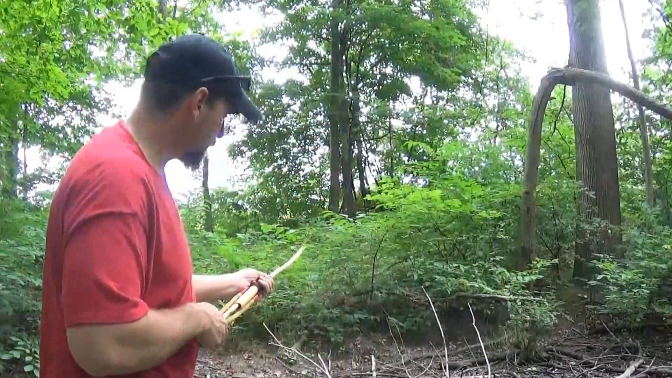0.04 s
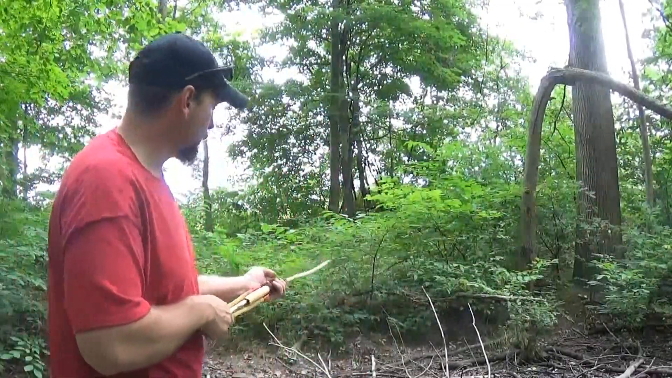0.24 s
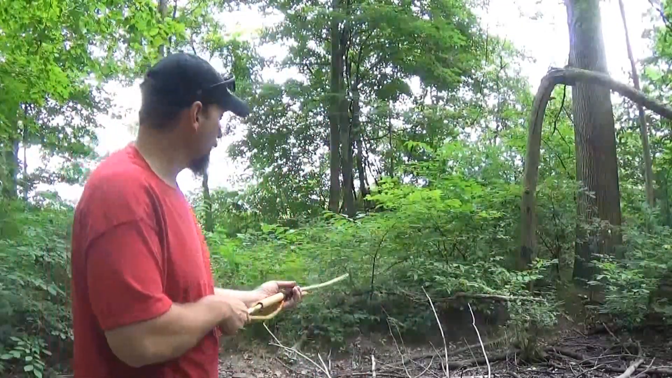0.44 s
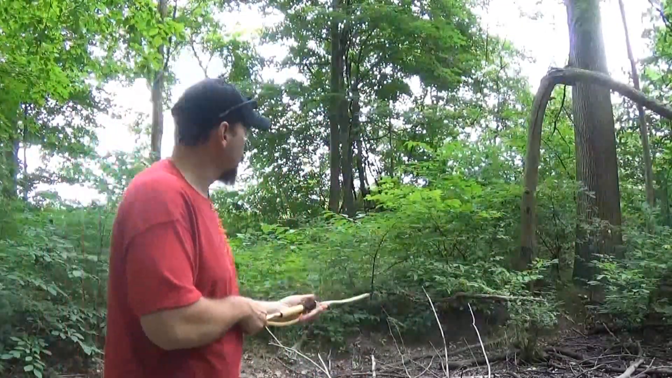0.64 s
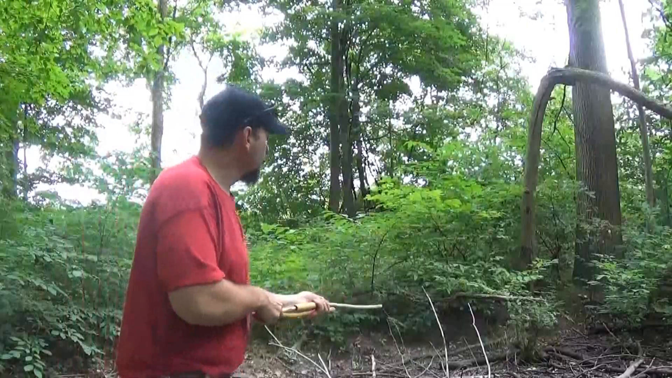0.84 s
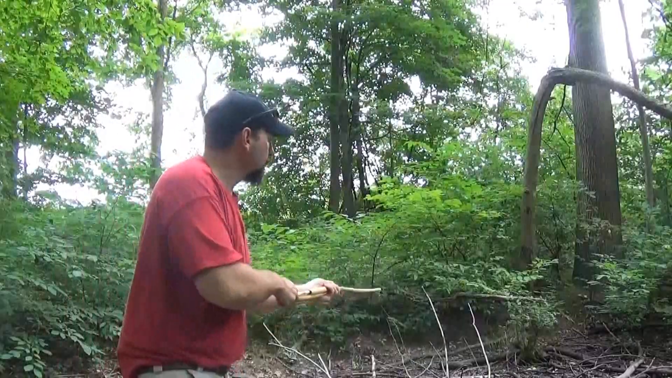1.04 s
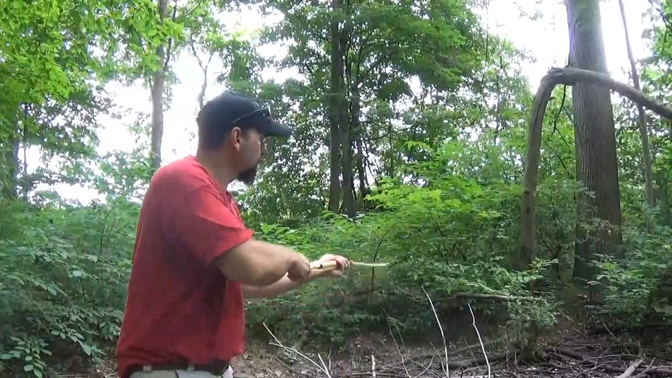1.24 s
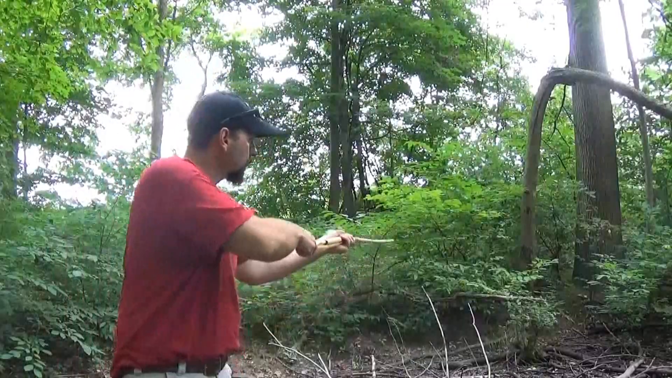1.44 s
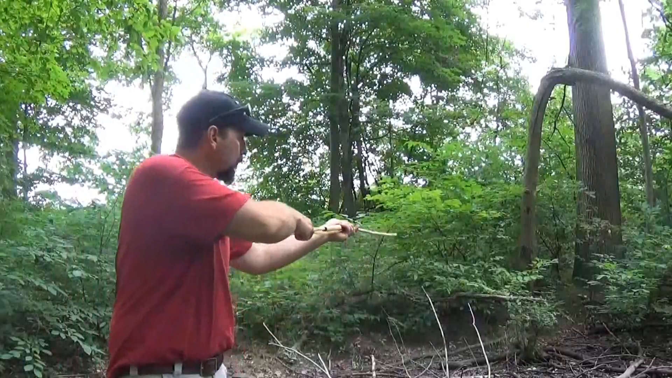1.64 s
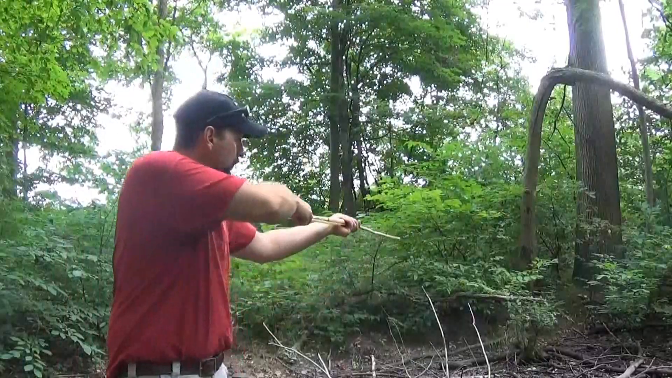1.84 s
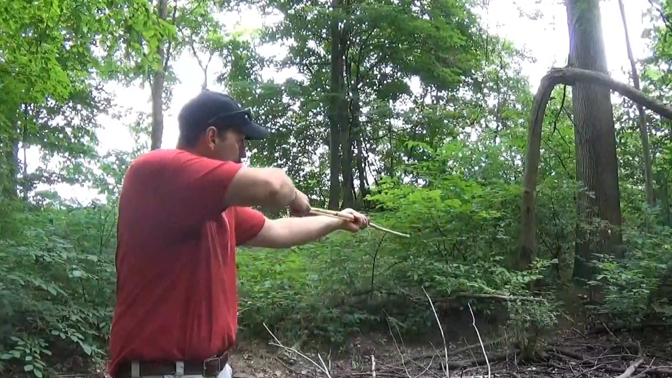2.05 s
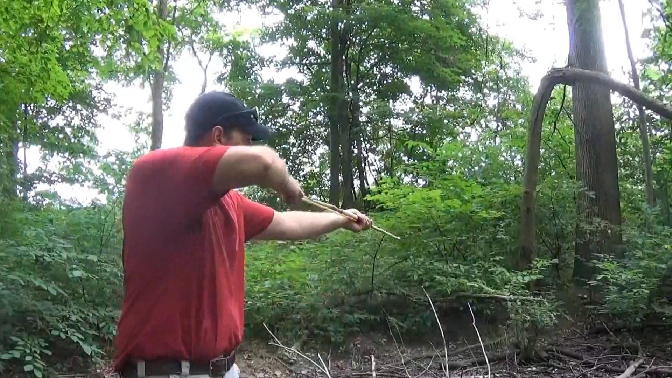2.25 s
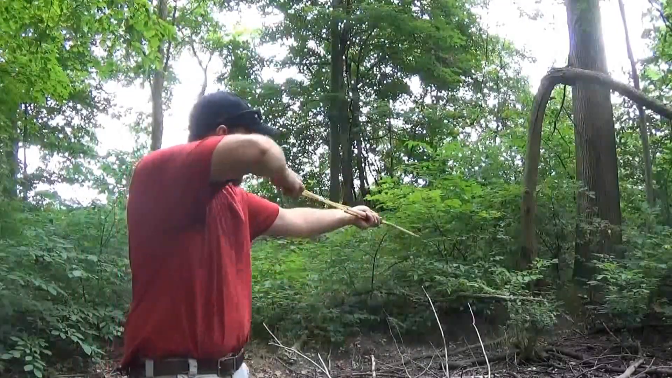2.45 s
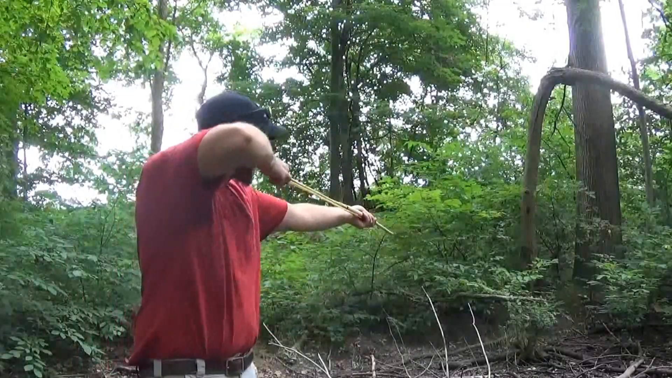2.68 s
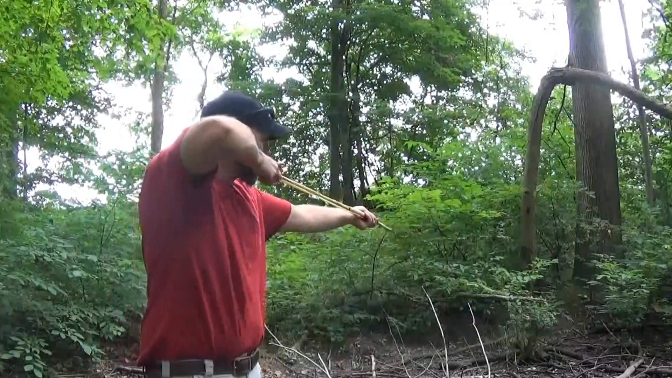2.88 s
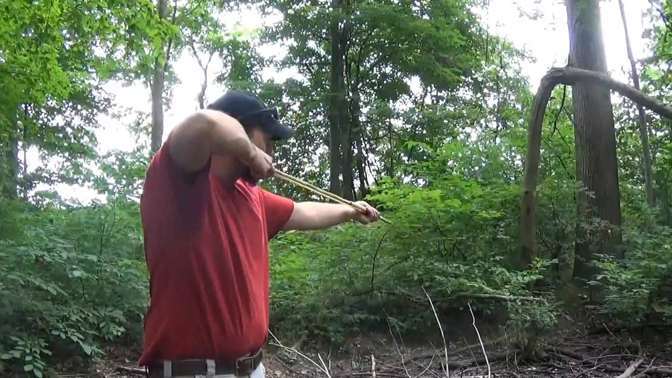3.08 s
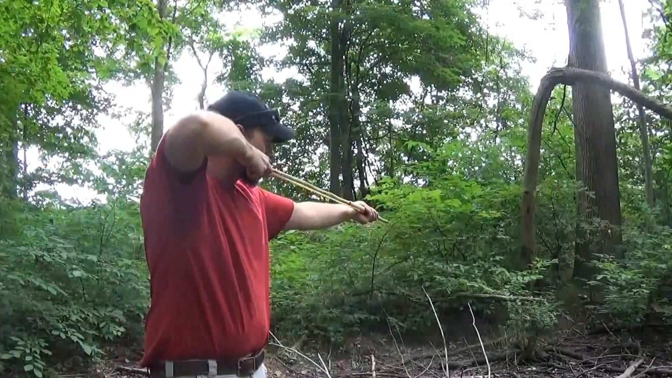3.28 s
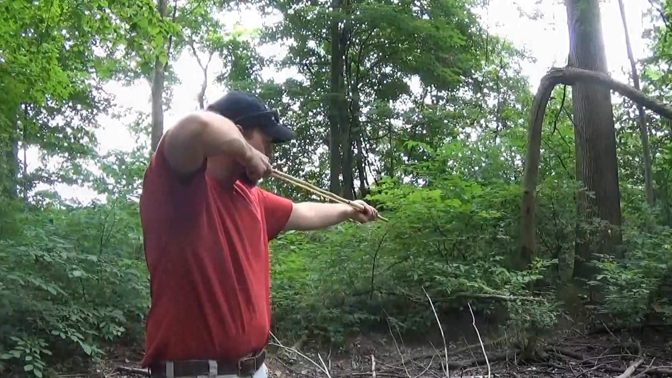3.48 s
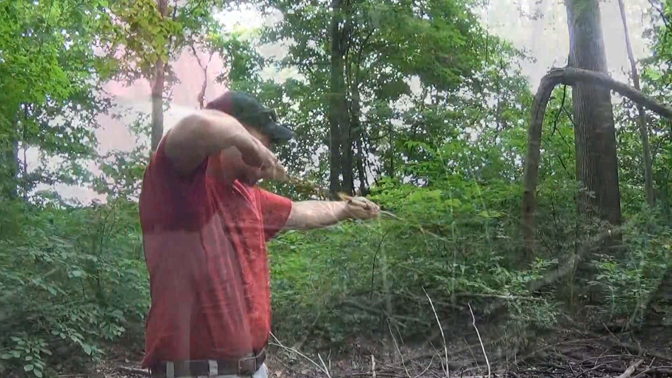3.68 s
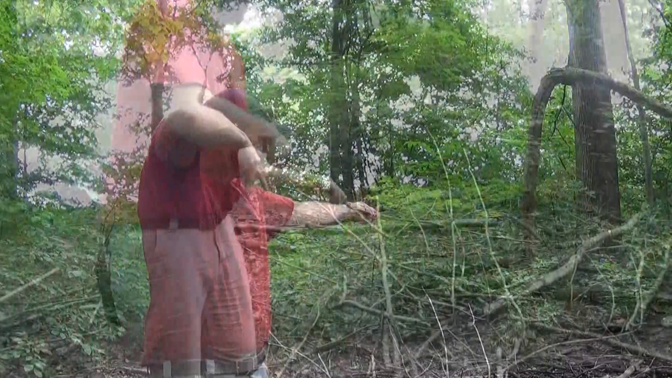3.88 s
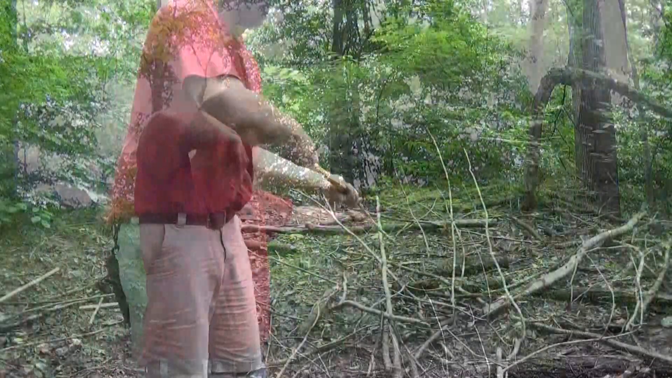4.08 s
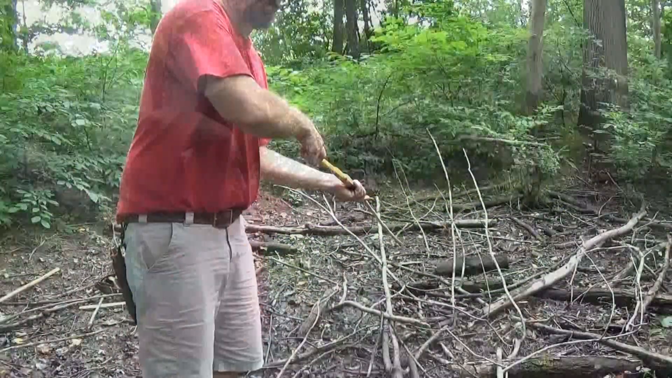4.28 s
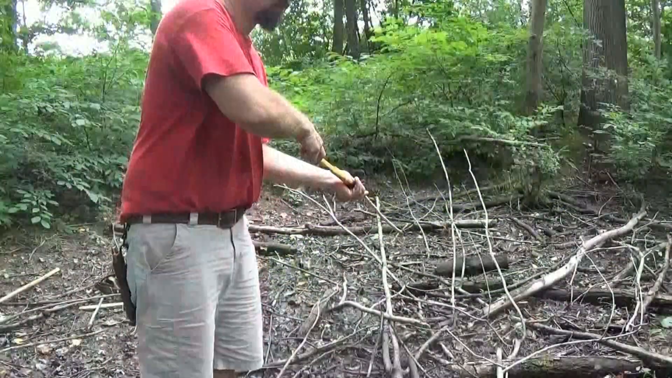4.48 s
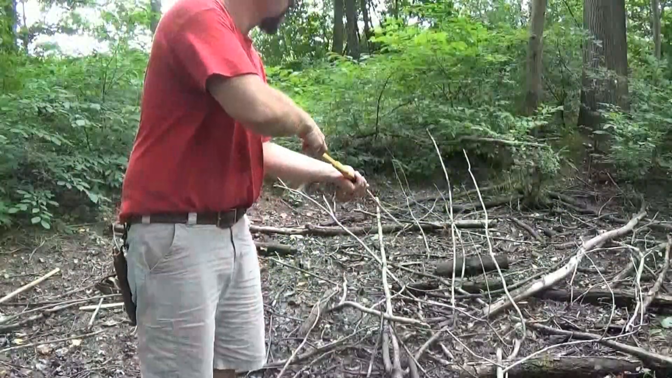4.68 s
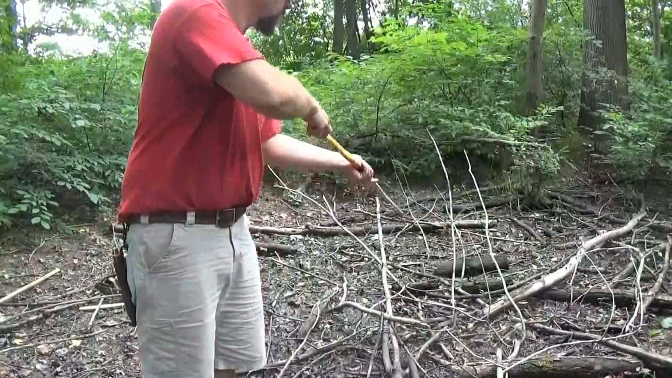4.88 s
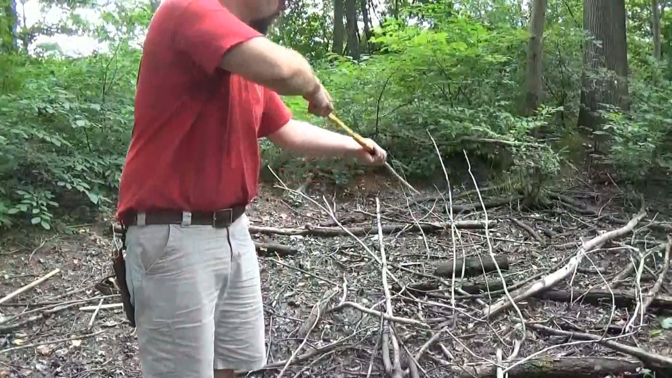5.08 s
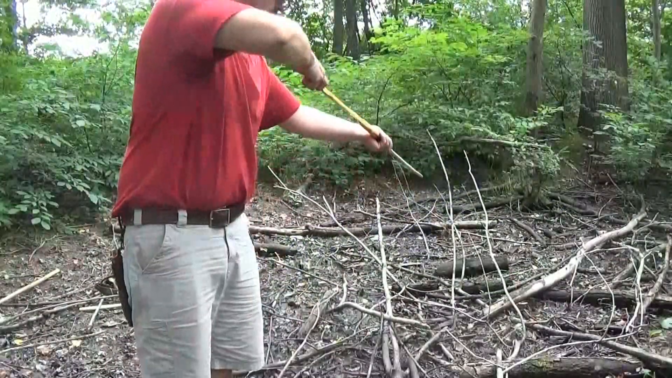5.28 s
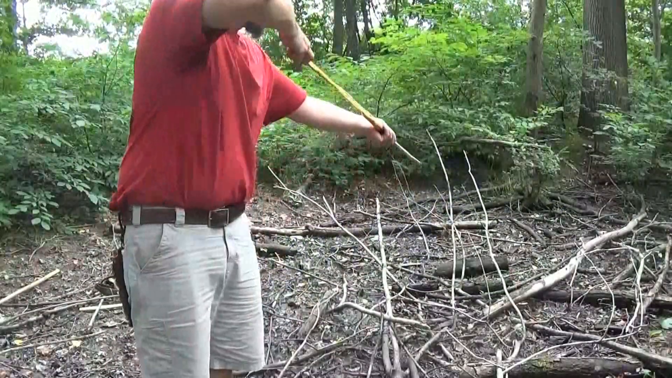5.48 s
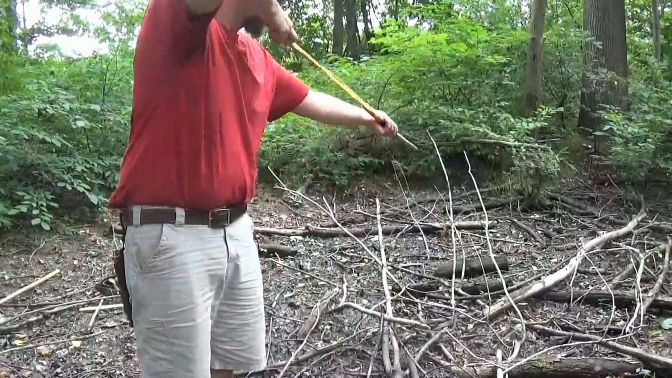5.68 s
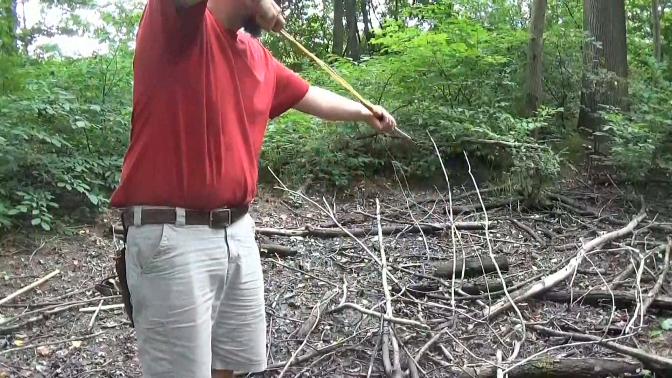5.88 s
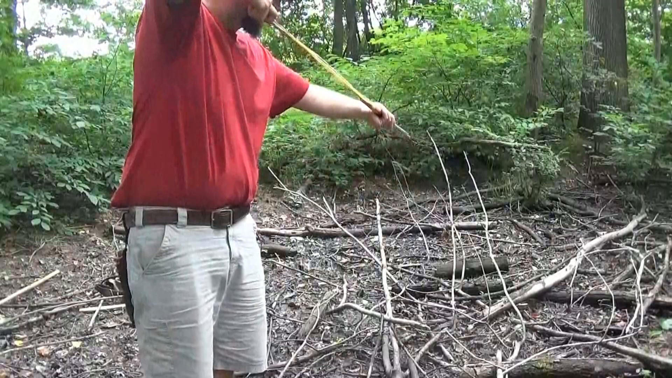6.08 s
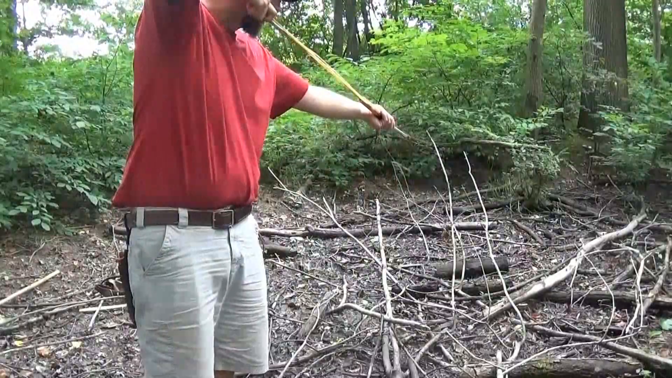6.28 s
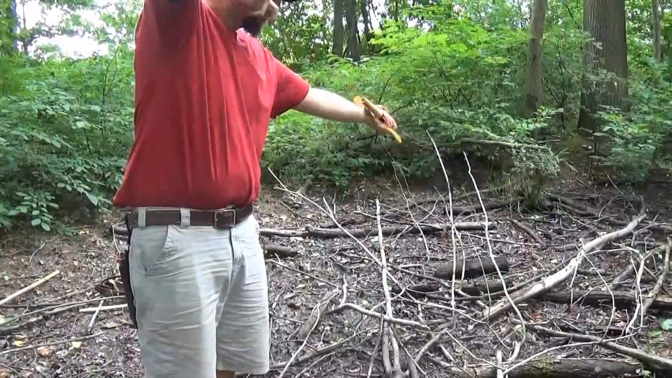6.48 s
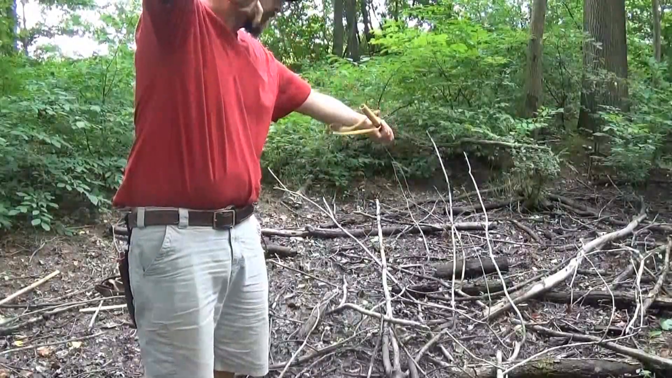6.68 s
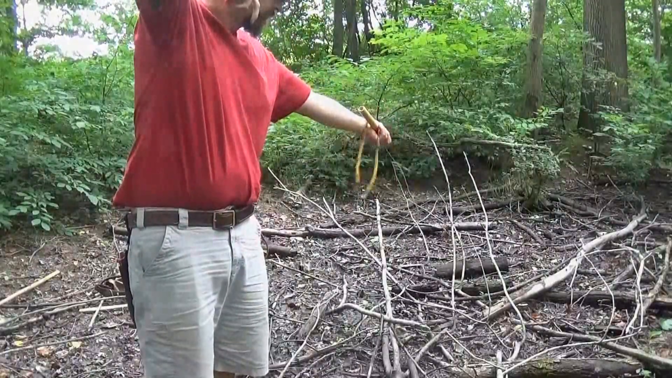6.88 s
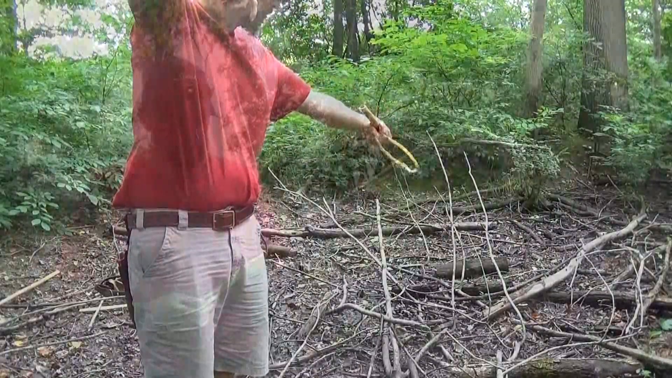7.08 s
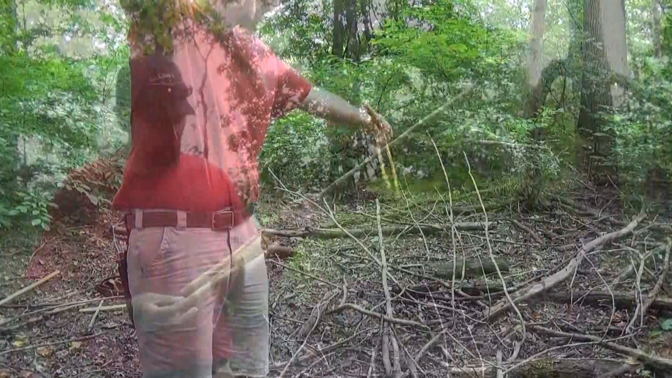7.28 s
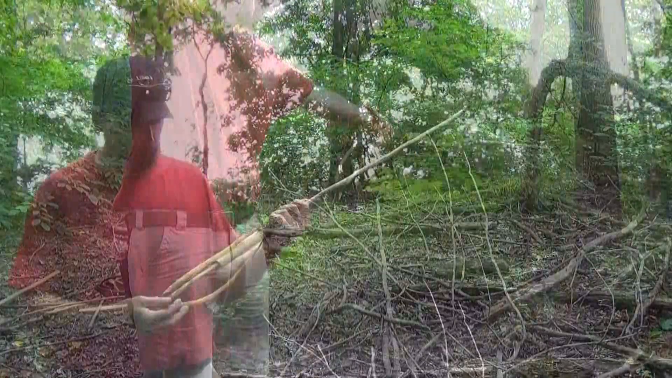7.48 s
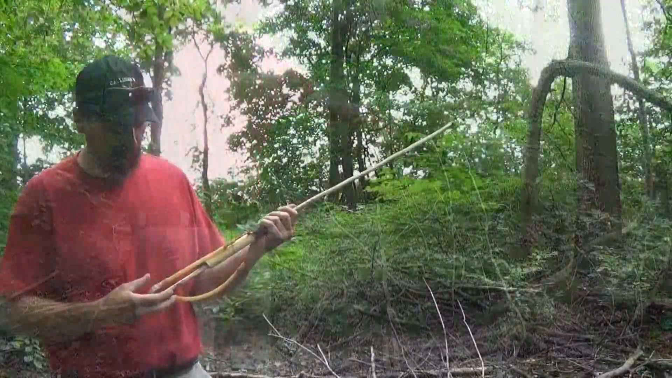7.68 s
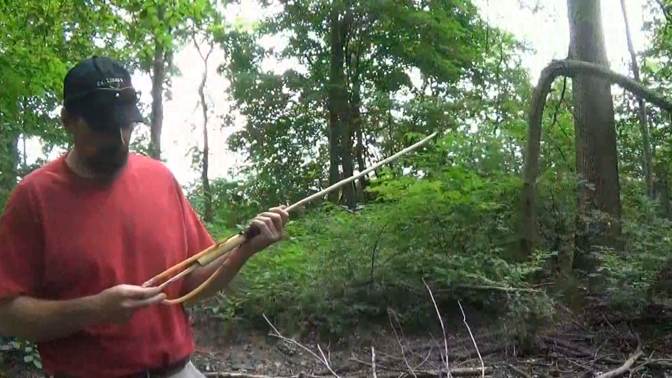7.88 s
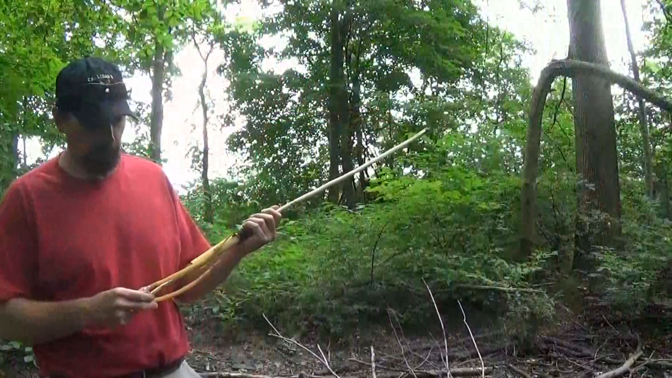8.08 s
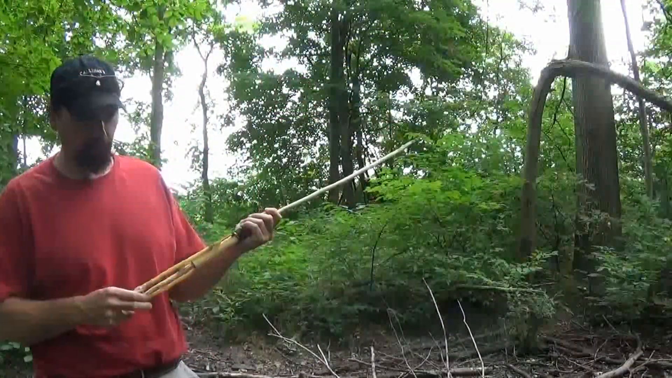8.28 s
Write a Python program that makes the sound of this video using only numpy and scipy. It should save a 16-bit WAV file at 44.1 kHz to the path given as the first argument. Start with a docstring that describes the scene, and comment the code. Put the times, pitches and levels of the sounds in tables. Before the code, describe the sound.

Summer insects shimmer constantly while someone fiddles with a slingshot; rubber bands whip and slap twice, louder the second time, with a dart thudding down.

```python
"""Summer woodland: a chorus of crickets and katydids over faint leaf hiss, a far hum and a far rumble.
Insects are bands of noise and pulsed wandering tones, with a camera's faint buzz among them.
Close by, someone handles a rubber slingshot (small ticks of band, dart and twigs) and lets fly twice:
the slack bands whip forward in a rush of noise and slaps, the second dart thuds into soil.
The trees send back a short scattered echo of the ticks and shots; leaves and cloth are shaped noise."""
import sys
import numpy as np
from scipy import signal
from scipy.io import wavfile

SR = 44100
rng = np.random.default_rng(int(sys.argv[2]) if len(sys.argv) > 2 else 0)


def put_to_file(sound):
    """Save the sound as 16-bit audio at rate SR, in the file named by the first command-line argument."""
    columns = np.atleast_2d(sound).T  # one column per channel
    safe = np.clip(columns, -1, 1)
    whole_steps = np.round(safe * 32767)
    wavfile.write(sys.argv[1], SR, whole_steps.astype(np.int16))


N = 367794


def amp(db):
    """Gain of a level in dB."""
    return 10 ** (np.asarray(db) / 20)


def rms_one(x):
    """Scale to rms 1."""
    return x / np.sqrt(np.mean(x ** 2) + 1e-20)


def in_time(rows, **ends):
    """Columns of a breakpoint curve, one value per sample."""
    s, *columns = np.transpose(rows)
    return [np.interp(np.arange(N) / SR, s, column, **ends) for column in columns]


def at_hz(points, hz):
    """Read a spectrum on a log-frequency axis."""
    point_hz, values = np.transpose(points)
    return np.interp(np.log(hz), np.log(point_hz), values)


def drift(rate_hz):
    """Slow random wander of rms 1: noise through two equal low-pass poles, drawn every 40th sample."""
    step = 40
    r = np.exp(-2 * np.pi * rate_hz * step / SR)
    white = rng.standard_normal(N // step + 2002)
    slow = signal.lfilter([1], [1, -2 * r, r * r], white)[2000:]   # skip the settling
    return np.interp(np.arange(N) / step, np.arange(len(slow)), rms_one(slow))


def resonate(x, hz, width_hz):
    """One two-pole resonance with a gain of about 1 at its peak."""
    r = np.exp(-np.pi * width_hz / SR)
    feedback = [1, -(1 + r * r) * np.cos(2 * np.pi * hz / SR), r * r]
    return signal.lfilter([(1 - r * r) / 2, 0, (r * r - 1) / 2], feedback, x)


def resonate_twice(x, hz, width_hz):
    """The same resonance twice, for steeper skirts."""
    return resonate(resonate(x, hz, width_hz), hz, width_hz)


def high_pass(x, hz):
    """Fourth-order cut of the lows."""
    return signal.sosfilt(signal.butter(4, hz, "high", fs=SR, output="sos"), x)


def spread(pair, hz):
    """Left and right from a mid and a side noise, alike to the degree set for that pitch."""
    # Left-right likeness. Each row: pitch in Hz, correlation of the two sides.
    likeness = [(60, 0.84), (130, 0.99), (250, 0.64), (600, 0.35), (1200, 0.19), (3600, 0.57), (6500, 0.77),
                (11000, 0.88)]
    alike = np.clip(at_hz(likeness, hz), -1, 1)
    mid, side = pair
    return np.sqrt(1 + alike) * mid + np.sqrt(1 - alike) * side * [[1], [-1]]


def noise_band(hz, width_hz):
    """Stereo noise twice through one resonance; rms 1."""
    white = rng.standard_normal((2, N))
    return rms_one(spread(resonate_twice(white, hz, width_hz), hz))


def coloured(white, spectrum):
    """Half-octave bands of two noise draws, dealt in turn: yields (Hz, band)."""
    edges = 25 * 2 ** np.arange(0, 9.1, .5)
    for k, (low, high) in enumerate(zip(edges, edges[1:])):
        hz = np.sqrt(low * high)
        band_pass = signal.butter(2, [low, high], "band", fs=SR, output="sos")
        yield hz, amp(at_hz(spectrum, hz)) * signal.sosfilt(band_pass, white[k % 2])


def pulse_train(per_s, start, share):
    """Smooth bumps, one a cycle, silent for the rest of it; start is a share of the cycle."""
    place = (per_s * np.arange(N) / SR - start) % 1
    return np.sin(np.pi * np.minimum(place / share, 1)) ** 2


def wandering_tone(hz, wander_hz):
    """A clear tone of wandering pitch and uneven strength, out of step on the two sides."""
    turns = np.cumsum(hz + wander_hz * drift(120)) / SR
    side_phase = .5 * drift(7.7) * [[1], [-1]]
    return np.sqrt(2) * amp(0.75 * drift(25)) * np.sin(2 * np.pi * turns + side_phase)


def burst(hz, width_hz, t60):
    """A click and dying noise twice through a broad resonance; peak 1."""
    t = np.arange(SR // 2) / SR
    push = rng.standard_normal(len(t)) * (amp(-60 * t / t60) + 1e-18)
    push[0] = 6.8   # the first contact stands out
    out = resonate_twice(push, hz, width_hz)
    return out / np.abs(out).max()


def swells(base_db, rows):
    """A steady gain with smooth swells added in power."""
    t = np.arange(N) / SR
    bumps = sum(amp(2 * db) * np.cos(np.pi * np.clip((t - middle) / length, -.5, .5)) ** 2
                for middle, length, db in rows)
    return np.sqrt(amp(2 * base_db) + bumps)


def add(track, s, sound):
    """Mix a sound in at a time in seconds."""
    i = round(s * SR)
    track[..., i:i + sound.shape[-1]] += sound[..., :N - i]


def far_rumble():
    """A low band of noise that slowly rises and falls."""
    # Each row: time in seconds, level in dB.
    rumble_curve = [(0, -79), (.9, -71.5), (1.7, -78), (2.1, -76.5), (3.0, -79), (3.6, -84.5), (5.3, -89.5),
                    (6.5, -84), (7.3, -88), (8.34, -81)]
    level_db, = in_time(rumble_curve)
    return amp(level_db) * noise_band(142, 110)


def far_hum():
    """A narrow low band of noise that wavers and swells."""
    # Each row: middle of the swell in seconds, length in seconds, level in dB before the waver.
    hum_swells = [(1.1, 0.82, -77), (2.7, 1.4, -78), (4.5, 0.37, -88), (6.15, 0.23, -74), (6.6, 0.76, -83),
                  (8.3, .3, -83)]
    waver = amp(1.4 * drift(0.53))
    return swells(-89, hum_swells) * waver * noise_band(102, 8.4)


def leaf_hiss(mid_db):
    """Broad hiss of the wood: half-octave bands of noise that flicker independently."""
    # Colour of the leaf hiss. Each row: frequency in Hz, relative density in dB per Hz.
    leaf_colour = [(24, -52), (40, -27), (102, -12.5), (151, -22.5), (188, -9.5), (528, -3), (1150, -2.5),
                   (1570, -4), (2690, -5.5), (4600, -2.5), (5980, -26), (10100, -120)]
    breadth_db = 6.5   # whole hiss over its mid band
    bands = coloured(rng.standard_normal((2, 2, N)), leaf_colour)
    hiss = rms_one(sum(amp(1.47 * drift(3.7)) * spread(band, hz) for hz, band in bands))
    return amp(mid_db + breadth_db) * hiss


def far_crowds():
    """Far singers blur into flickering bands of noise."""
    # Each row: centre in Hz, width in Hz, level in dB under the insects' gain.
    crowd_bands = [(5440, 840, -8), (6458, 500, -3), (6803, 670, -4), (7430, 1900, -12.5)]
    crowds = sum(amp(db + 1.0 * drift(5.8)) * noise_band(hz, width) for hz, width, db in crowd_bands)
    return crowds * amp([[-.4], [.4]])


def near_katydid():
    """A katydid rasps: four unequal wing strokes a phrase gate a narrow band of noise."""
    # Each row: start in the phrase from 0 to 1, relative gain in dB.
    pulses = [(.0, 0), (.24, -12), (.48, -6), (.76, 6)]
    phrases_per_s, level_db = 36.4, -7   # level against the insects' gain
    phrase = sum(amp(db) * pulse_train(phrases_per_s, place, share=0.27) for place, db in pulses)
    rasp = rms_one(phrase * noise_band(6500, 240))
    return amp(level_db) * rasp * amp([[-.6], [.6]])


def high_chorus(swing_db):
    """A high flickering band of far song that follows part of the wood's swing."""
    mean_db, follows = -55.5, 0.72
    return amp(mean_db + follows * swing_db + 0.67 * drift(4.6)) * noise_band(8390, 1130)


def trills_and_buzz(swing_db):
    """Crickets trill in clear pulsed tones; the faint 2680 Hz row is a camera's buzz, pulsed 59.9 a second."""
    # Each row: pitch in Hz, pitch wander in Hz, level in dB against their common gain,
    # pulses per second, share of the cycle that sounds.
    pulsed_tones = [(3720, 75.2, -1.5, 65.2, 1), (5394, 200, 3, 67, 0.23), (2680, 74, -11.5, 59.9, 0.59)]
    tones = sum(amp(db) * rms_one(pulse_train(per_s, 0, share) * wandering_tone(hz, wander))
                for hz, wander, db, per_s, share in pulsed_tones)
    return amp(-63 + swing_db) * tones


def low_cricket():
    """A low cricket joins late: short slow chirps of a wandering tone fade in."""
    start_s, fade_s, chirps_per_s, level_db = 7.05, 0.4, 14.95, -73
    fade = np.clip((np.arange(N) / SR - start_s) / fade_s, 0, 1)
    chirps = rms_one(pulse_train(chirps_per_s, .38, share=0.14) * wandering_tone(2680, 90))
    return amp(level_db) * fade * chirps


def rustle():
    """Cloth and leaves stir close by: grainy bright noise with a broad lower shoulder."""
    # Each row: middle of the stir in seconds, length in seconds, gain in dB.
    stirs = [(.7, 1.0, -60), (2.4, 1.36, -62.5), (4.3, 0.33, -60), (5.37, 1.1, -66.5), (6.7, .7, -64),
             (8.3, .5, -68)]
    grain = amp(1.4 * drift(60))
    noise = amp(5) * noise_band(10050, 7300) + amp(-1.5) * noise_band(3370, 5000)
    return swells(-67, stirs) * grain * noise


def swishes():
    """Each soft swish of cloth is a smooth swell of broad noise."""
    # Each row: start in seconds, length in seconds, level in dB before the swell shape, centre in Hz.
    swish_rows = [(.455, .035, -53, 9800), (0.602, .12, -61, 9000), (1.35, 0.055, -50, 8800),
                  (2.601, 0.18, -50.5, 4500), (4.165, 0.08, -56, 3000), (4.24, .1, -61, 9000),
                  (8.038, 0.026, -59, 2700)]
    out = np.zeros((2, N))
    for s, length, db, hz in swish_rows:
        noise = rng.standard_normal((2, SR))[:, :int(length * SR)]
        noise = noise + 2.3 * noise[0]   # a shared part makes the two sides more alike
        noise = resonate_twice(noise, hz, 1.1 * hz)
        add(out, s, amp(db) * rms_one(noise) * np.hanning(noise.shape[1]))
    return out


def ticks():
    """Each handling tick is a hollow knock, a dry click and a sharp bright edge."""
    # Each row: start in seconds, knock peak in dB, knock Hz, click peak in dB, click Hz,
    # click width as a share of its Hz, edge peak in dB, left over right in dB; peaks are before panning.
    tick_rows = [(0.4717, -73, 720, -49, 3720, 1.1, -37, -2), (0.6172, -42, 630, -46, 3150, 1.1, -42, -1),
                 (0.6953, -70, 1100, -41, 2600, 1.1, -38, -1), (0.7382, -47, 930, -34, 2740, 1.3, -50, 1),
                 (0.8142, -58, 660, -44, 2850, 0.97, -36, 3),
                 (0.9727, -34.5, 704, -29.5, 2710, 1.26, -15.5, 1),
                 (1.0147, -52, 780, -46, 1460, .6, -67, 2), (1.0495, -47, 830, -34, 1700, 1.34, -32, 2),
                 (1.1106, -47.5, 804, -23, 4050, 0.42, -23, 1.5),
                 (1.3682, -52, 760, -53, 3600, 1.1, -37, 2), (1.4067, -56, 610, -27, 3480, 2.5, -23.5, 1.5),
                 (2.292, -64, 380, -41, 2860, 1.1, -50, -4), (2.3844, -65, 260, -34, 3660, 1.1, -34, 0),
                 (2.6712, -48.5, 580, -40, 4310, 1.1, -54, 0), (3.2012, -51, 504, -44, 1600, .95, -66, 0),
                 (3.8185, -54, 1080, -32, 2940, .6, -34, 1),
                 (4.0774, -50, 814, -28, 3400, .36, -27.5, -3.5),
                 (4.1649, -47, 685, -53, 3240, 1.1, -28, 1), (4.1914, -50, 1120, -41, 3270, 1.1, -46, -3),
                 (4.26, -51, 900, -47, 1900, .6, -72, 0), (4.2948, -52, 960, -45, 1680, .44, -47, 5),
                 (4.3082, -50, 553, -40, 3320, 1.1, -26, 3), (4.4469, -64, 400, -32.5, 3530, 1.2, -35, 4),
                 (5.471, -47, 836, -38, 1400, 1.5, -42, 1), (5.8792, -47.5, 567, -42, 1500, 1.3, -59, 1),
                 (6.753, -54, 1130, -29, 3480, .7, -38, 0), (7.2489, -58, 500, -41.5, 2870, 0.96, -62, -1),
                 (7.608, -62, 660, -54, 3720, 1.1, -33, 1), (7.8255, -70, 660, -33.5, 4210, 1.4, -31, 2),
                 (8.046, -68, 680, -43.5, 2820, .4, -38, 0)]
    knock_t60, click_t60, edge_t60 = 0.059, 0.02, 0.018   # s, decay of each driving noise
    out = np.zeros((2, N))
    for s, knock_db, knock_hz, click_db, click_hz, breadth, edge_db, pan_db in tick_rows:
        knock = amp(knock_db) * burst(knock_hz, 0.92 * knock_hz, knock_t60)
        click = amp(click_db) * burst(click_hz, breadth * click_hz, click_t60)
        edge = amp(edge_db) * burst(9360, 4300, edge_t60)
        add(out, s, (knock + click + edge) * amp([[pan_db / 2], [-pan_db / 2]]))
    return out


def dart_thud():
    """The dart lands in soil: resonant bursts from low to bright."""
    # Each row: centre in Hz, peak in dB, decay of the driving noise as t60 in seconds.
    thud_parts = [(110, -56, .13), (252, -47.5, 0.074), (890, -39, 0.07), (1480, -26.5, 0.039),
                  (3930, -15.5, 0.036), (9440, -14, 0.036)]
    out = np.zeros(N)
    for hz, db, t60 in thud_parts:
        add(out, 6.632, amp(db) * burst(hz, 0.63 * hz, t60))
    return out


def twang():
    """The bands ring on from the second shot: hollow resonances struck together."""
    # Each row: centre in Hz, width in Hz, peak in dB, decay of the driving noise as t60 in seconds.
    twang_parts = [(678, 72, -38, 0.22), (880, 160, -25.5, 0.04), (310, 210, -39.5, 0.059)]
    out = np.zeros(N)
    for hz, width, db, t60 in twang_parts:
        add(out, 6.514, amp(db) * burst(hz, width, t60))
    return out


def slaps():
    """Single slaps of rubber inside the rush: very short broad bursts."""
    # Each row: start in seconds, peak in dB, centre in Hz.
    slap_rows = [(3.719, -30, 3250), (3.7252, -27, 3200), (3.732, -29, 3500), (3.7434, -25, 5120),
                 (3.7474, -19, 2170), (3.7484, -28, 1400), (3.7498, -26, 8440), (3.7544, -21, 3190),
                 (3.7558, -6, 9000), (3.761, -13, 9130), (3.7667, -29, 9000), (3.7705, -17.5, 4070),
                 (3.7645, -27, 1400), (3.7727, -21, 2100), (3.7768, -19, 2170), (3.7995, -28, 2800),
                 (6.4824, -23.5, 3330), (6.4834, -10.5, 8910), (6.4915, -15, 9090), (6.496, -22, 4130),
                 (6.4998, -16, 9950), (6.5013, -13, 2730), (6.5106, -10.5, 2710), (6.5117, -9, 9000),
                 (6.5159, -9, 3600), (6.5183, -6, 9390), (6.5247, -10, 3440), (6.5275, -16, 2200),
                 (6.5292, -8, 7320), (6.5359, -10, 2440), (6.538, -18, 8800), (6.5485, -25, 2710),
                 (6.5603, -25.5, 2330), (6.5654, -22.5, 2880)]
    out = np.zeros(N)
    for s, db, hz in slap_rows:
        add(out, s, amp(db) * burst(hz, 0.64 * hz, t60=0.014))
    return out


def rush_level(go, full, slack, collapse):
    """Level of one shot under its top, dB: jump, climb, hold, collapse, then a slower dying."""
    onset_s, onset_db, early_db = 0.012, -30, -11   # first level, then the one it jumps to
    collapse_db, after_db_per_s = -12, 212
    end = slack + collapse
    return in_time([(go, onset_db), (go + onset_s, early_db), (full, 0), (slack, 0), (end, collapse_db),
                    (end + 1, collapse_db - after_db_per_s)], left=-200)[0]


def rushes():
    """Flapping rubber: lumpy noise, a hissing top and a hollow flap rise and collapse with each shot."""
    # Each row: let go, full speed and bands overshoot in seconds, collapse length in seconds,
    # gains in dB of the rush, the hissing top and the hollow flap.
    shot_rows = [(3.714, 3.745, 3.765, 0.034, -29.5, -32.5, -38),
                 (6.464, 6.513, 6.533, 0.01, -25.5, -29, -37)]
    # Colour of the rush. Each row: frequency in Hz, relative density in dB per Hz.
    rush_colour = [(530, -25), (900, -13), (1070, -18), (1350, -9), (1590, -8), (2830, -4), (3200, -5.5),
                   (4730, -5), (7500, -10.5), (9750, -41), (16500, -120)]
    # Hollow resonances of the slack bands. Each row: centre in Hz, width in Hz, relative gain in dB.
    flap_modes = [(578, 130, 7.5), (687, 170, -12), (800, 92, 5.5)]
    hiss_follows, flap_follows = 0.77, 1.22   # share of the rush's swing in dB
    flap_lead_s, flap_ease_s, flap_early_db = .006, .004, -9

    lumpy = rng.standard_normal((3, N)) * amp(3.03 * drift(155))
    whip = high_pass(rms_one(sum(band for _, band in coloured(lumpy, rush_colour))), 700)
    hiss = rms_one(resonate_twice(lumpy[2], 9450, 3300))
    flap = sum(amp(db) * resonate(lumpy[2], hz, width) for hz, width, db in flap_modes)
    flap = rms_one(high_pass(flap, 400))

    out = np.zeros(N)
    for go, full, slack, collapse, whip_db, hiss_db, flap_db in shot_rows:
        under_db = rush_level(go, full, slack, collapse)
        # the flap is held back until just before full speed
        held = np.clip((full - flap_lead_s - np.arange(N) / SR) / flap_ease_s, 0, 1)
        out += amp(whip_db + under_db) * whip
        out += amp(hiss_db + hiss_follows * under_db) * hiss
        out += amp(flap_db + flap_early_db * held + flap_follows * under_db) * flap
    return out


def shots():
    """Two slingshot shots, a little to the right: rush, slaps, twang and the dart's thud."""
    return (rushes() + slaps() + twang() + dart_thud()) * amp([[-.4], [.4]])


def trees(x):
    """Trunks and leaves scatter a dense echo, a different dying noise in each ear."""
    # What trunks and leaves send back. Each row: centre in Hz, width in Hz, relative gain in dB.
    echo_bands = [(2900, 4500, 1.5), (8650, 3200, 2)]
    t60, rise_s, echo_db = 0.59, 0.0018, -17.5
    t = np.arange(SR) / SR
    tail = rng.standard_normal((2, SR)) * amp(-60 * t / t60) * np.minimum(t / rise_s, 1)
    tail = sum(amp(db) * resonate_twice(tail, hz, width) for hz, width, db in echo_bands)
    tail /= np.sqrt(np.sum(tail[0] ** 2))
    return amp(echo_db) * signal.fftconvolve(x, tail, axes=1)[:, :N]


def scene():
    """Wood behind, handling and shots in front."""
    # The wood's loudness dips twice. Each row: time in seconds, insects' gain in dB,
    # level of the leaf hiss's mid band in dB.
    wood_curve = [(0.0, -45.5, -63.5), (0.32, -46, -63.5), (0.9, -46.5, -62), (1.02, -46, -62.5),
                  (1.97, -46, -65), (2.53, -46, -63.5), (2.79, -46, -64.5), (3.14, -45.5, -64),
                  (3.99, -49, -65.5), (4.32, -48.5, -65.5), (4.71, -47, -64.5), (6.43, -46.5, -65),
                  (6.64, -45.5, -62.5), (6.92, -46.5, -65.5), (7.29, -49, -68), (7.57, -49, -68),
                  (7.97, -46, -65), (8.34, -45.5, -65)]
    insects_db, mid_db = in_time(wood_curve)
    swing_db = insects_db - insects_db.mean()
    air = far_rumble() + far_hum() + leaf_hiss(mid_db)
    chorus = amp(insects_db) * (far_crowds() + near_katydid())
    tones = trills_and_buzz(swing_db) + low_cricket()
    near = ticks() + shots()
    return air + chorus + high_chorus(swing_db) + tones + rustle() + swishes() + near + trees(near)


def record(dry):
    """A steep elliptic low-pass cuts the top above 11 kHz."""
    return signal.sosfilt(signal.ellip(11, .5, 65, 11000, fs=SR, output="sos"), dry)


dry = scene()
out = record(dry)
put_to_file(out)
```